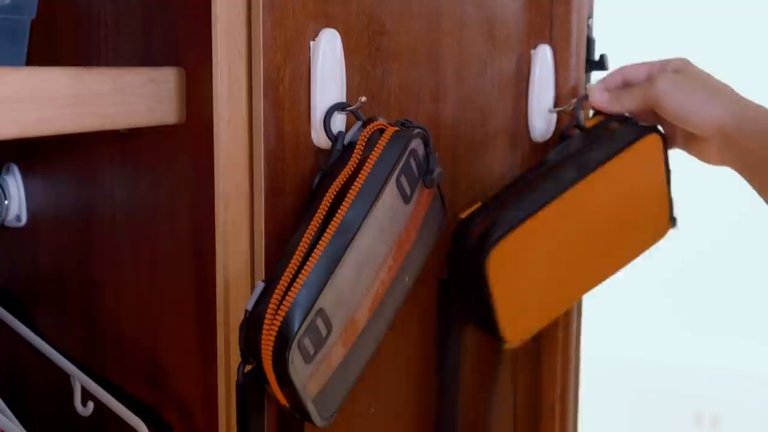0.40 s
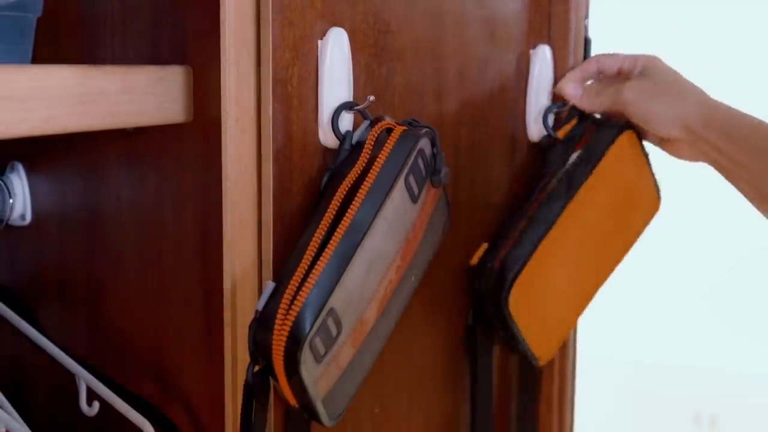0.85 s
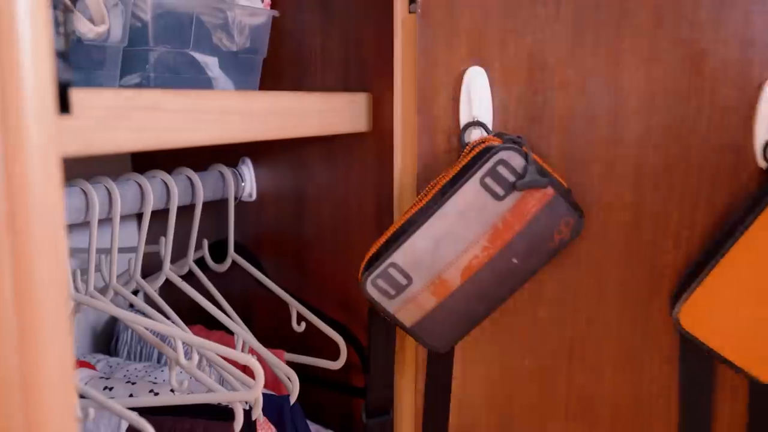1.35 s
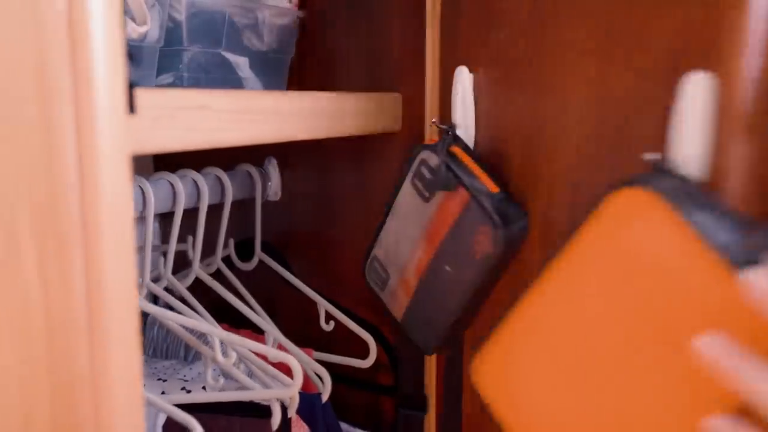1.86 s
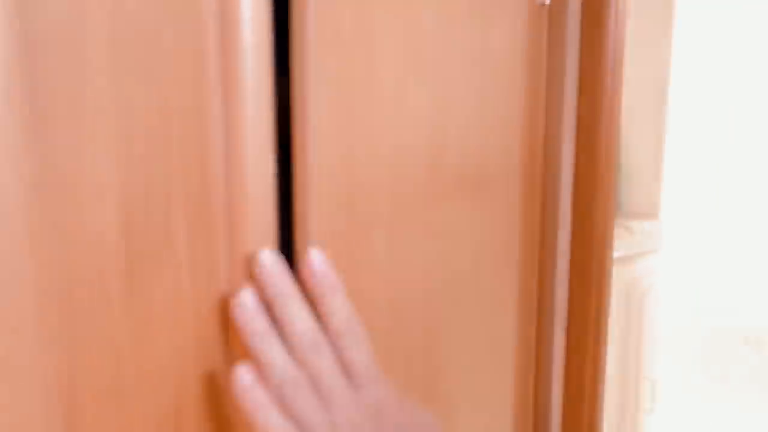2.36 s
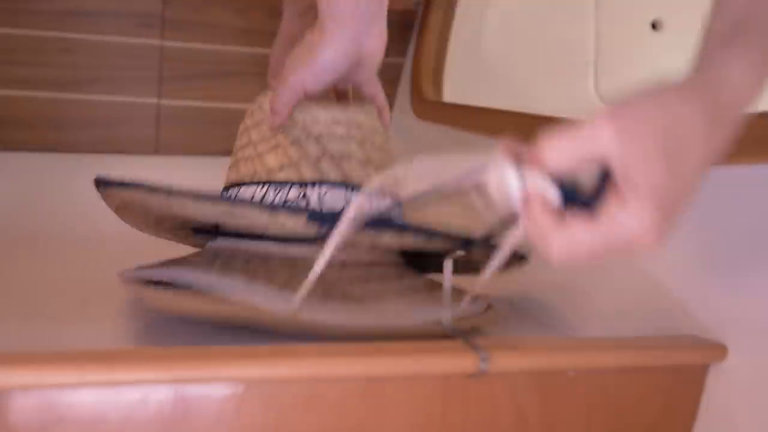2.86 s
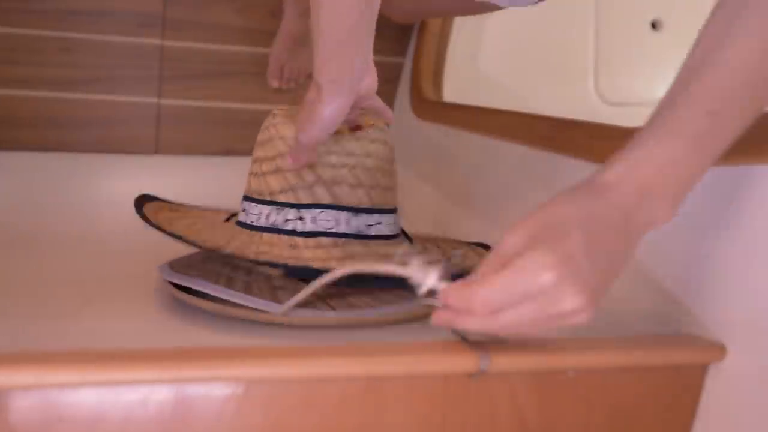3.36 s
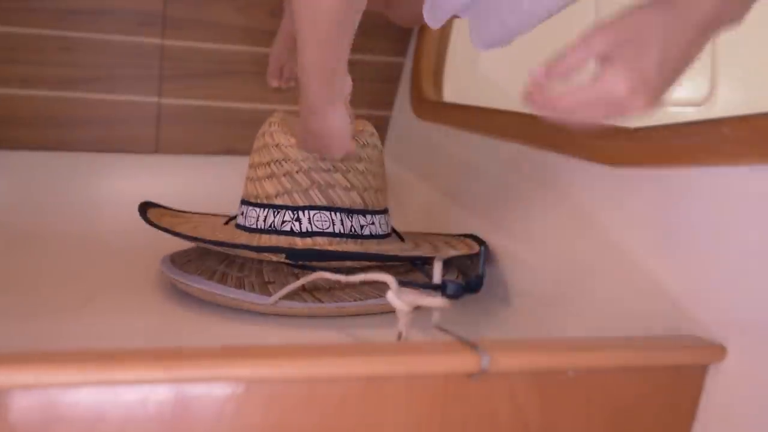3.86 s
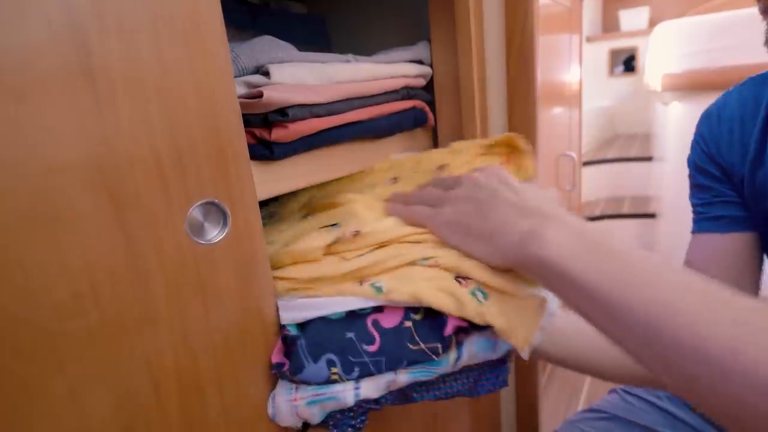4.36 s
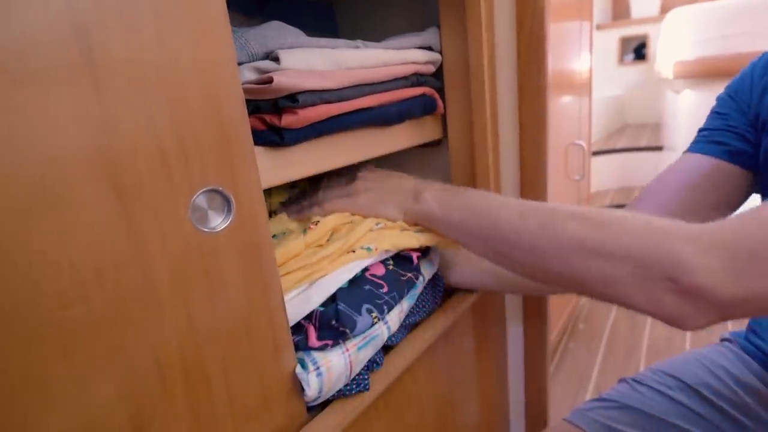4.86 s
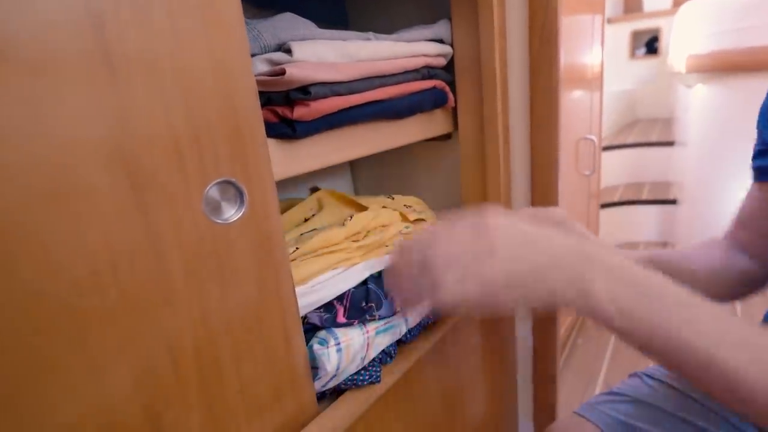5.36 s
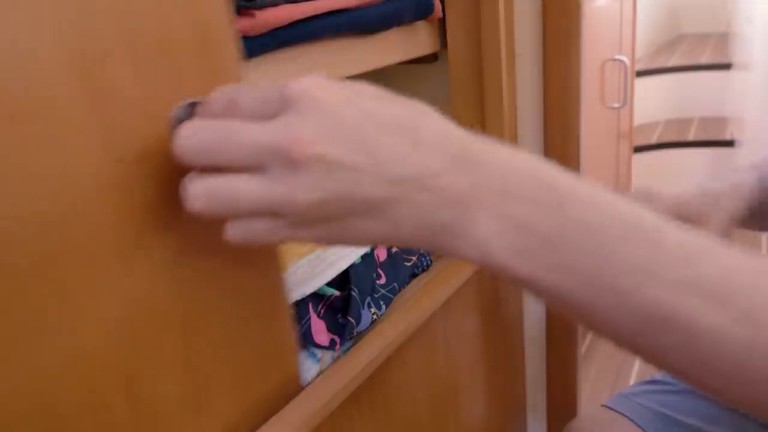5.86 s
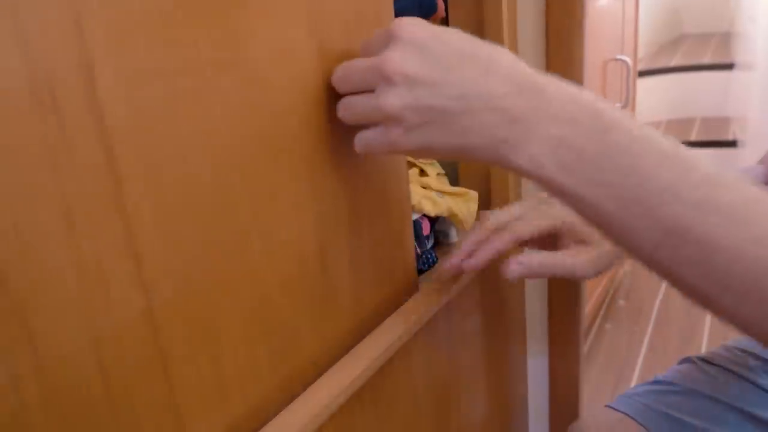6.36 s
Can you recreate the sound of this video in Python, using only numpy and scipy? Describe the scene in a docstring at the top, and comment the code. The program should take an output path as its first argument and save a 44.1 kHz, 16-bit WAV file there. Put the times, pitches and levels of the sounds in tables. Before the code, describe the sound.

Close-up stowing in a small wooden cabin: bottle knocks, hook clatter, door thumps, crisp straw ticks, soft cloth dragging, then a stuttering wooden sliding door.

```python
"""Stowing things in a wooden cabin

A bottle is set on a shelf, a pouch hung on a door hook, a wardrobe shut, straw hats laid down,
clothes pushed into a cupboard, and its door judders along a wooden track.
Blows are a push and a dying noise rattle through panel resonances; glass and squeaks are sines;
cloth, hands, sliding wood and air are shaped noise, with a faint whine. Noise tails of the walls answer the hits.
"""
import sys
import numpy as np
from scipy import signal
from scipy.fft import rfft, irfft, next_fast_len
from scipy.io import wavfile
from scipy.ndimage import uniform_filter1d, map_coordinates

SR = 44100
rng = np.random.default_rng(int(sys.argv[2]) if len(sys.argv) > 2 else 0)


def int16_out(signal):
    """Quantize to a 16-bit WAV file."""
    q = np.round(np.clip(np.atleast_2d(signal).T, -1, 1) * 32767)
    wavfile.write(sys.argv[1], SR, q.astype(np.int16))


def invert_db(x):
    """Field ratio 10**(x/20) for x, a level in decibels (scalar or array-like)."""
    u = np.asarray(x, float) / 20
    return 10 ** u


N = 297319  # samples


def unit(x):
    """Scaled to rms 1."""
    return x / np.sqrt(np.mean(x ** 2) + 1e-20)


def along(points, hz):
    """(hz, value) points interpolated on a log frequency axis."""
    f, v = np.transpose(points)
    return np.interp(np.log(hz + 1), np.log(f + 1), v)


def curves(rows):
    """One value per sample for each column after the time."""
    s, *cols = np.transpose(rows)
    return [np.interp(np.arange(N) / SR, s, c) for c in cols]


def wobble(rate_hz):
    """Smooth random curve, rate_hz knots a second."""
    knots = rng.standard_normal(int(N * rate_hz / SR) + 4)
    return map_coordinates(knots, [np.arange(N) * rate_hz / SR])


def filtered(x, response):
    """x times a complex response of frequency."""
    n = x.shape[-1]
    m = next_fast_len(n + SR // 8)
    return irfft(rfft(x, m) * response(np.fft.rfftfreq(m, 1 / SR)), m)[..., :n]


def add(out, start_s, sound):
    """Mixes a sound in at start_s."""
    spot = out[max(round(start_s * SR), 0):][:len(sound)]
    spot += sound[:len(spot)]


def strokes(rows):
    """Gain of movements that swell to a peak and fade, rise and fall per 20 dB; powers add."""
    t = np.arange(N) / SR
    power = 0
    for peak_s, db, rise_s, fall_s in rows:
        drop = np.maximum((peak_s - t) / abs(rise_s), (t - peak_s) / abs(fall_s))
        power = power + invert_db(db - 20 * drop) ** 2
    return np.sqrt(power)


def friction(spectrum, patchy_db, grain_db, rate_hz):
    """Shaped noise of rms 1, uneven in time and frequency, with random grains of level."""
    noise = rng.standard_normal(N) * invert_db(grain_db * wobble(rate_hz))
    z = signal.stft(noise, nperseg=512)[2]
    field = uniform_filter1d(rng.standard_normal(z.shape), size=5, axis=0)
    field = uniform_filter1d(field, size=5, axis=1)
    x = signal.istft(z * invert_db(patchy_db * unit(field)), nperseg=512)[1][:N]
    return unit(filtered(x, lambda hz: invert_db(along(spectrum, hz))))


def resonances(body, scatter_db, plain):
    """Causal panel response: a share of the plain blow plus second-order resonances."""
    def response(f):
        total = plain
        for (centre, width, gain_db), shift_db in zip(body, scatter_db):
            mode = 1j * f * width / (centre * centre - f * f + 1j * f * width)
            total = total + invert_db(gain_db + shift_db) * mode
        return total
    return response


def drag(body, spectrum):
    """Something drags over wood: stick and slip keep low resonances humming; panel applied twice, rms 1."""
    slips = rng.standard_normal(N) * invert_db(1.5 * wobble(90))
    ring = resonances(body, np.zeros(len(body)), plain=0.64)
    return unit(filtered(slips, lambda hz: ring(hz) ** 2 * invert_db(along(spectrum, hz))))


# room air spectrum: freq_hz, rel_db_per_hz
AIR_SPECTRUM = [(15, -43.5), (25, 14), (82, 11.5), (344, -40.5), (451, -2), (1290, -8.5), (1700, -7),
                (1840, -9), (2160, -11.5), (2350, -39), (16000, -21)]
# whine level: time_s, level_db
WHINE_LEVEL = [(0.0, -55), (.4, -63.5), (2.25, -60), (2.3, -80), (4.05, -75.5), (4.2, -56.5), (5.56, -54.5),
               (5.62, -75), (6.74, -73)]


def floor():
    """Still air as shaped noise; faint whine as a sine with drifting phase and level."""
    air_db, whine_hz = -53.5, 1672
    phase = 2 * np.pi * whine_hz * np.arange(N) / SR + np.cumsum(rng.normal(0, 0.0173, N))
    whine_gain = invert_db(curves(WHINE_LEVEL)[0] + 1.95 * wobble(8))
    whine = whine_gain * np.sqrt(2) * np.sin(phase)
    return whine + invert_db(air_db) * friction(AIR_SPECTRUM, patchy_db=3.04, grain_db=1.0, rate_hz=4.3)


# wall reverberation: freq_hz, t60_s
CABIN_DECAY = [(100, 0.227), (1000, 0.1836), (5000, 0.113), (14000, 0.275)]


def cabin(x):
    """Close wooden walls answer: decaying noise tails, a fresh one every 0.3 s."""
    out, step = np.zeros(N), SR * 3 // 10
    for start in range(0, N, step):
        hz, t, z = signal.stft(rng.standard_normal(SR // 2), SR, nperseg=256)
        fade = invert_db(-60 * t / along(CABIN_DECAY, hz)[:, None])
        tail = signal.istft(z * fade, SR, nperseg=256)[1]
        answer = signal.fftconvolve(x[start:start + step], tail / np.linalg.norm(tail))
        add(out, start / SR + .003, answer)
    return out


# rubbing levels: time_s, rumble_db, scrape_db
RUB_LEVELS = [(0.0, -38.5, -42), (0.5, -44, -48.5), (0.75, -42, -36), (0.88, -43.5, -50), (1.03, -31, -30),
              (1.24, -62.5, -57.5), (1.45, -47, -52.5), (1.8, -69, -62.5), (2.0, -57, -52.5),
              (2.33, -45, -56.5), (2.46, -27, -32), (2.53, -23, -41.5), (2.6, -29, -50), (2.7, -31.5, -39),
              (2.8, -48, -52.5), (3.3, -54, -52.5), (3.5, -56, -47), (4.0, -47, -52), (4.24, -51.5, -43.5),
              (4.47, -38, -37.5), (4.67, -29, -47), (5.1, -44, -43.5), (5.24, -30.5, -34.5),
              (5.4, -47, -52.5), (5.63, -47.5, -47), (5.76, -22.5, -36), (5.97, -29.5, -25.5),
              (6.18, -38, -32), (6.3, -28.5, -25.5), (6.42, -34, -37.5), (6.49, -39, -69.5),
              (6.58, -43.5, -67), (6.61, -39, -37), (6.74, -47.5, -36)]
# hands and cloth sweep by: peak_s, hiss_db, rise_s_per_20db, fall_s_per_20db (sign ignored)
HAND_SWEEPS = [(0.05, -55.5, 0.31, 0.94), (1.08, -52.5, 0.37, 0.31), (2.03, -50, 0.256, 0.14),
               (2.4, -45, 0.186, 0.19), (2.87, -47.5, 0.253, 0.2942), (3.45, -45, .12, 0.23),
               (3.525, -38.5, 0.125, 0.0968), (3.62, -42, 0.086, 0.038), (3.75, -59, 0.33, 0.43),
               (3.85, -43.5, 0.039, 0.1047), (3.89, -41, 0.091, -0.02), (4.13, -57, 0.19, 0.08),
               (4.52, -47, 0.566, -0.01), (4.77, -47.5, 0.105, 0.22), (5.26, -43, 0.53, 0.1573),
               (5.62, -46.5, 0.109, -1.7), (5.78, -29.5, 0.065, -0.0166), (5.98, -27.5, 0.162, 0.1139),
               (6.15, -45, 0.54, -1.06), (6.31, -28, 0.154, 0.0932), (6.42, -36, 0.37, -0.18),
               (6.6, -37.5, 0.014, 5.63), (6.67, -31.5, 0.076, 7.16), (6.74, -27, 0.12, 0.48)]
# cloth or straw jolted by a blow: peak_s, hiss_db
CLOTH_JOLTS = [(0.11, -44), (0.47, -31.5), (0.54, -38), (0.669, -51.5), (0.73, -42), (0.955, -38.5),
               (1.522, -39), (2.369, -36), (2.4, -40), (2.548, -42), (2.66, -36), (2.97, -40), (3.08, -45),
               (4.56, -34)]
# straw textured hiss: from_s, to_s
STRAW_TIME = (2.6, 3.97)
# spectra of panel rumble, scrape, cloth hiss, straw hiss: freq_hz, rel_db_per_hz
RUMBLE_SPECTRUM = [(18, -43), (30, -4), (102, 14), (132, -4.5), (170, -2.5), (220, -21.5), (370, -120)]
SCRAPE_SPECTRUM = [(88, -45.5), (150, 2.5), (352, -5.5), (395, -1), (468, 1), (563, -4), (771, -2.5),
                   (1250, -6.5), (1710, -8.5), (4500, -25), (5850, -73.5), (9900, -120)]
HISS_SPECTRUM = [(1500, -5), (2500, -0.5), (4000, -5), (7000, -7), (11000, -13), (14000, -13.5),
                 (15700, -17), (16400, -45)]
STRAW_SPECTRUM = [(1500, -3), (3000, -5), (6000, -5), (10000, -5), (14000, -4.5), (15700, -5.5),
                  (16400, -27)]


def rubbing():
    """Hands, cloth, straw, sliding wood: panels rumble, surfaces scrape, fibres hiss; straw is brightest."""
    still_db, jolt_rise_s, jolt_fall_s = -72.5, 0.0272, 0.116  # jolt times per 20 dB
    rumble_db, scrape_db = curves(RUB_LEVELS)
    jolts = [(s, db, jolt_rise_s, jolt_fall_s) for s, db in CLOTH_JOLTS]
    moves = strokes(HAND_SWEEPS + jolts)
    t = np.arange(N) / SR
    is_straw = (t > STRAW_TIME[0]) & (t < STRAW_TIME[1])
    straw = friction(STRAW_SPECTRUM, patchy_db=3.0, grain_db=1.0, rate_hz=730)
    cloth = friction(HISS_SPECTRUM, patchy_db=0.83, grain_db=1.5, rate_hz=240)
    hiss = np.where(is_straw, straw, cloth)
    rumble = friction(RUMBLE_SPECTRUM, patchy_db=2.0, grain_db=1.0, rate_hz=35)
    scrape = friction(SCRAPE_SPECTRUM, patchy_db=0.5, grain_db=2.0, rate_hz=180)
    return invert_db(rumble_db) * rumble + invert_db(scrape_db) * scrape + (invert_db(still_db) + moves) * hiss


# wood squeaks: start_s, length_s, pitch_hz, level_db
WOOD_SQUEAKS = [(5.234, 0.093, 4217, -50.5), (6.031, 0.225, 4078, -41)]


def squeaks():
    """Rubbing wood squeaks: thin sines with wandering phase and level."""
    out = np.zeros(N)
    for start_s, length_s, pitch_hz, level_db in WOOD_SQUEAKS:
        t = np.arange(int(length_s * SR)) / SR
        drift = np.cumsum(rng.normal(0, .045, len(t)))
        gain = invert_db(level_db + 2.8 * wobble(58.7)[:len(t)])
        swell = np.sqrt(np.sin(np.pi * t / length_s))
        add(out, start_s, gain * swell * np.sin(2 * np.pi * pitch_hz * t + drift))
    return out


# clothes pushed in: peak_s, level_db, rise_s_per_20db, fall_s_per_20db
CLOTHES_PUSHES = [(4.39, -31, 0.156, 0.2078), (5.27, -31, 0.154, 0.1171)]
# shelf under the clothes: centre_hz, width_hz, gain_db
CLOTHES_PANEL = [(282, 114, 1.45), (408.8, 45, 9.3), (464.6, 25.3, 7.5), (1003, 135, 3.4)]
# clothes drag spectrum: freq_hz, rel_db_per_hz
CLOTHES_SPECTRUM = [(100, -15), (250, 2.5), (500, -6), (1200, -6), (2500, -8.5), (6000, -59)]


def clothes():
    """The pile of clothes drags over its shelf in swelling strokes."""
    return strokes(CLOTHES_PUSHES) * drag(CLOTHES_PANEL, CLOTHES_SPECTRUM)


# parts of a blow (knock, thud, clack, crisp): low_hz, high_hz, t60_factor, push_weight
BLOW_PARTS = [(383.3, 1371, 1.075, 15.07), (56, 296, 1.54, 21.64), (1625, 4576, 1.118, 11.86),
              (5330, 24800, 0.402, 5.1)]


def blows(events, body, loose, rise_s, top_hz, plain):
    """One push and a dying rattle (weight loose) ring the panel, in four bands; rise_s caps the swell."""
    start_s, knock_db, thud_db, clack_db, crisp_db, t60_s = np.transpose(events)
    t = np.arange(SR * 3 // 10) / SR
    # every blow lands elsewhere and stirs the resonances differently
    scatter_db = 5.11 * rng.standard_normal((len(body), len(start_s), 1))
    ring = resonances(body, scatter_db, plain)
    rattle = loose * rng.standard_normal((len(start_s), len(t)))
    out = np.zeros(N)
    rel_dbs = [0 * knock_db, thud_db, clack_db, crisp_db]
    for (low_hz, high_hz, t60_factor, push), rel_db in zip(BLOW_PARTS, rel_dbs):
        fade = invert_db(-60 * t / (t60_factor * t60_s)[:, None]) + 1.66 * invert_db(-60 * t / 0.01096)
        band = signal.butter(3, [low_hz, min(high_hz, top_hz)], "bandpass", fs=SR, output="sos")
        # the treble speaks at once, the body takes a moment
        swell = 1 - np.exp(-(t + 1 / SR) / (rise_s * min(1, 500 / low_hz)))
        struck = filtered(rattle * fade + push * (t == 0), ring)
        part = swell * signal.sosfilt(band, struck)
        # size each part by its loudest 200 samples
        size = np.sqrt(2 * uniform_filter1d(part ** 2, size=200).max(1))
        for at_s, gain, row in zip(start_s, invert_db(knock_db + rel_db) / size, part):
            add(out, at_s, gain * row)
    return out


def like(events, **shared):
    """Full rows of a blow: shared values join the columns of the table."""
    own = iter(np.transpose(events))
    names = ("start_s", "knock_db", "thud_db", "clack_db", "crisp_db", "t60_s")
    return np.transpose([np.full(len(events), float(shared[name])) if name in shared else next(own)
                         for name in names])


# In all blow tables thud, clack and crisp are relative to the knock; t60_s is before t60_factor.
# straw snaps and cord toggles tick: start_s, knock_db, clack_rel_db, crisp_rel_db
HAT_TICKS = [(2.633, -36.5, 3.5, 6.5), (2.661, -34.5, 13.5, 12.5), (2.734, -40, 6, 7.5),
             (2.77, -32, -24.5, -24.5), (2.849, -48.5, 3, 12.5), (2.867, -52, -1, 18),
             (2.961, -39.5, -4, 8), (3.011, -36, -11, 3), (3.069, -39, -9, 3), (3.105, -46, 3.5, -2.5),
             (3.887, -34, -29.5, 1.5), (4.121, -38, -20, -4)]
# soft straw landing: start_s, knock_db, thud_rel_db, clack_rel_db
STRAW_PATS = [(2.926, -32.5, 4, -16), (2.945, -29.5, -5.5, -14.5), (3.503, -37, -3, -2),
              (3.593, -33.5, -1.5, -12.5), (3.836, -32, 2, -12), (3.86, -41, 1, 0)]
# shelf under the hats: centre_hz, width_hz, gain_db
HAT_PANEL = [(133.9, 18.3, 2.6), (198.3, 18, 5.34), (491.5, 46, 4.9), (609.6, 53, 3.1), (2712, 153, 3.8),
             (13250, 4500, 5.4)]


def hats():
    """Hats on a shelf: quick ticks, and pats with a slow rise."""
    ticks = like(HAT_TICKS, thud_db=-3, t60_s=0.095)
    pats = like(STRAW_PATS, crisp_db=-9.5, t60_s=0.154)
    return (blows(ticks, HAT_PANEL, loose=1.0, rise_s=0.0001, top_hz=15450, plain=0.875)
            + blows(pats, HAT_PANEL, loose=2.0, rise_s=0.0094, top_hz=16000, plain=1.0))


# glass modes: pitch_hz, rel_db, t60_s
GLASS_MODES = [(1588, 0, .17), (2480, -22, .12), (3865, -12, .11), (5350, -15, .07), (5530, -19, .15),
               (6330, -12, .09), (7250, -17, .14), (7900, -22, .08), (8800, -18, .1), (9400, -21, .1)]
# glass contacts: start_s, level_db, upper_rel_db
GLASS_CLINKS = [(0.0, -29.5, -30.5), (.048, -40, 9), (0.098, -32, 7.5), (0.141, -31, -12)]


def glass():
    """The bottle rings: decaying sines, a low wall mode and upper modes whose level each contact sets."""
    out, t = np.zeros(N), np.arange(SR // 2) / SR
    for start_s, level_db, upper_rel_db in GLASS_CLINKS:
        for pitch_hz, rel_db, t60_s in GLASS_MODES:
            mode_db = level_db + rel_db + upper_rel_db * (pitch_hz > 2000) + rng.normal(0, 1.25)
            add(out, start_s, invert_db(mode_db - 60 * t / t60_s) * np.sin(2 * np.pi * pitch_hz * t))
    return out


# bottle set down: start_s, knock_db, thud_rel_db, clack_rel_db, t60_s
BOTTLE_KNOCKS = [(0.047, -13, 0.5, -15, 0.0645), (0.1, -16.5, -21, -17, 0.0207),
                 (0.142, -19.5, 4, -27.5, 0.146)]
# shelf under the bottle: centre_hz, width_hz, gain_db
BOTTLE_PANEL = [(183.3, 33.3, 38), (321.6, 85, 21), (512.5, 173, 18.5), (611.2, 25.2, 24), (890, 72, 8.5)]


def bottle():
    """The bottle's contacts knock the shelf and ring the glass."""
    events = like(BOTTLE_KNOCKS, crisp_db=-34)
    return glass() + blows(events, BOTTLE_PANEL, loose=0.59, rise_s=0.006, top_hz=10500, plain=0.61)


# pouch against hook and door: start_s, knock_db, clack_rel_db, crisp_rel_db, t60_s
POUCH_KNOCKS = [(0.456, -19, 9.5, -2.5, 0.31), (0.529, -23, -4, -2, 0.168), (0.627, -16, 3.5, -17, 0.1706),
                (0.736, -33.5, 4, -2, 0.082), (0.88, -12, -12, -38.5, 0.217), (0.926, -26.5, 2, 1.5, 0.1),
                (0.952, -21, 6.5, -28, 0.121), (1.014, -25.5, -4, -27, 0.054),
                (1.076, -23.5, 1, -23, 0.118), (1.199, -30.5, 5, -36, 0.173), (1.519, -29, 5.5, 4, 0.111),
                (1.833, -41.5, -8, -14.5, 0.313), (1.867, -38.5, -13, -12.5, 0.255)]
# pouch body bumps the door: start_s, knock_db
POUCH_BUMPS = [(0.629, -39.5), (0.881, -33), (0.926, -40.5), (1.014, -47)]
# pouch ring ticks on the hook: start_s, knock_db
RING_TICKS = [(0.584, -27), (0.719, -24.5), (0.768, -26), (0.825, -36), (1.142, -28.5), (1.247, -40),
              (1.312, -34), (1.344, -39), (1.406, -28.5)]
# door with the hook, ring on the hook: centre_hz, width_hz, gain_db
HOOK_PANEL = [(181, 18.1, 23.2), (651.5, 205, 4.4), (799.6, 108, 1.5), (930, 57, 9.06), (2095, 264, 12),
              (2416, 150, 5.9), (2747, 430, 16), (3410, 426, 6.5)]
RING_MODES = [(824, 120, 29.5), (1980, 310, 3)]


def pouch():
    """Hook knocks and dull body bumps ring the door; the pouch's ring ticks on its own modes."""
    hook = like(POUCH_KNOCKS, thud_db=-20.5)
    bumps = like(POUCH_BUMPS, thud_db=15.5, clack_db=-17, crisp_db=-30, t60_s=0.176)
    ticks = like(RING_TICKS, thud_db=-40.5, clack_db=-18.5, crisp_db=-37.5, t60_s=0.069)
    return (blows(hook, HOOK_PANEL, loose=1.13, rise_s=0.00126, top_hz=10860, plain=0.564)
            + blows(bumps, HOOK_PANEL, loose=0.956, rise_s=0.0045, top_hz=9000, plain=0.54)
            + blows(ticks, RING_MODES, loose=0.35, rise_s=0.0013, top_hz=9000, plain=0.305))


# wardrobe door shut: start_s, knock_db, thud_rel_db, clack_rel_db, crisp_rel_db
WARDROBE_KNOCKS = [(1.446, -53, 12, 4, -1), (2.272, -32, -29.5, -6, 5), (2.319, -48.5, 16.5, 13.5, 4),
                   (2.357, -14.5, 8, -8, -10.5), (2.398, -16, -14, -3, -3), (2.409, -19, -2, 0, -18.5),
                   (2.463, -33, 8, 5, -26), (2.513, -20.5, 11, -4, -15.5), (2.546, -19, 7.5, -6, -15),
                   (2.617, -41, 15, 3, 3.5)]
# wardrobe door: centre_hz, width_hz, gain_db
WARDROBE_PANEL = [(102.6, 28.6, 24.54), (234, 13.5, 6.3), (367.9, 33, 5.5), (555.7, 143, 9.4),
                  (1195, 67, 3.3), (1880, 490, 2.3)]


def wardrobe():
    """The shutting door knocks and rings its own panel."""
    events = like(WARDROBE_KNOCKS, t60_s=0.1026)
    return blows(events, WARDROBE_PANEL, loose=0.924, rise_s=0.00258, top_hz=14770, plain=1.0)


# hands bump the cupboard: start_s, knock_db, thud_rel_db, clack_rel_db, crisp_rel_db
STOWING_BUMPS = [(4.384, -29, -8.5, -6.5, -16), (4.462, -33.5, 4.5, -29, -11.5), (4.563, -12, -1, -4, -17),
                 (4.683, -39.5, 20, 3.5, -4.5), (4.756, -18, -6.5, -8.5, -37.5),
                 (4.854, -21.5, -8, -14, -28.5), (4.924, -25, -9.5, -9, -32),
                 (4.959, -38, 24.5, -25.5, -26), (4.981, -28.5, -1, -4.5, -30.5),
                 (4.996, -28.5, 2, -9, -29), (5.128, -40, 14, -4.5, -11.5), (5.454, -52.5, 3, 18, 28),
                 (5.582, -31.5, 13, -3, -11.5)]
# cupboard shelf: centre_hz, width_hz, gain_db
CUPBOARD_PANEL = [(121.8, 21.8, 5.7), (254.3, 60, 5.98), (651.5, 79.6, 7.63), (785.2, 62.5, 11.3),
                  (1584, 175, 0.97), (1865, 104, 2.3), (2574, 377, 9.7)]


def stowing():
    """Hands bump the cupboard and ring its shelf."""
    events = like(STOWING_BUMPS, t60_s=0.0697)
    return blows(events, CUPBOARD_PANEL, loose=1.0, rise_s=0.00454, top_hz=15800, plain=0.79)


# cupboard door: centre_hz, width_hz, gain_db
SLIDING_PANEL = [(113.3, 11.6, 8.35), (169.8, 38.3, 6.8), (232.3, 98.6, 6.94), (612.3, 134, 10.3),
                 (765.3, 91, 3.5), (1021, 17.8, 3.3), (1654, 156, 0.39), (2232, 830, 1.03)]
# level following the door's speed: time_s, level_db
SLIDE_LEVEL = [(5.74, -37), (5.772, -29), (5.886, -39.5), (5.908, -23), (6.026, -47.5), (6.046, -18.5),
               (6.156, -11.5), (6.294, -27), (6.324, -23), (6.399, -54.5), (6.421, -18), (6.46, -40.5)]
# door drag spectrum: freq_hz, rel_db_per_hz
DOOR_SPECTRUM = [(40, -40), (100, -1), (200, 1), (300, 3), (600, -14.5), (1000, -56), (2000, -38),
                 (5000, -60)]


def slide():
    """The door drags on its track, near silent outside the level table."""
    s, db = np.transpose(SLIDE_LEVEL)
    gain = invert_db(np.interp(np.arange(N) / SR, s, db, -120, -120))
    return gain * drag(SLIDING_PANEL, DOOR_SPECTRUM)


# cupboard door knocks: start_s, knock_db, thud_rel_db, clack_rel_db, crisp_rel_db
DOOR_KNOCKS = [(5.725, -26, -5, 5.5, -4), (5.755, -9.5, -5.5, -8, -17.5), (5.769, -9.5, -4, -3, -12),
               (5.799, -13, -2.5, -6, -30.5), (5.819, -20, -8, -31.5, -34), (5.866, -15.5, -12, 1, -2.5),
               (5.979, -19, -9, 1.5, -27), (6.245, -19, 6, -4.5, -19.5), (6.289, -12, -9.5, -6.5, -17.5),
               (6.31, -10.5, -2, -1.5, -15), (6.416, -31, 15.5, -3, -7.5), (6.475, -34.5, 4.5, -16.5, -26),
               (6.727, -20.5, 12, -9, -25.5)]
# door sticks and slips on its track: start_s, knock_db, thud_rel_db, clack_rel_db
DOOR_JUDDER = [(6.04, -4.5, -16.5, -11), (6.06, -15, 5.5, -6.5), (6.093, -6.5, -0.5, -14.5),
               (6.112, -16.5, 2, -25), (6.131, -4, -0.5, -14.5), (6.166, -9, -13, -27.5),
               (6.186, -12, 5, -37), (6.201, -12.5, 5, -36), (6.223, -21.5, 14, -28.5)]


def cupboard_door():
    """Knocks and stick-slip judder ring the sliding door's panel."""
    events = like(DOOR_KNOCKS, t60_s=.135)
    judder = like(DOOR_JUDDER, crisp_db=-37.5, t60_s=0.0556)
    return (blows(events, SLIDING_PANEL, loose=1.0, rise_s=0.00234, top_hz=11130, plain=0.866)
            + blows(judder, SLIDING_PANEL, loose=0.279, rise_s=0.0032, top_hz=11000, plain=0.76))


def scene():
    """Hits ring in the cabin over sliding, rubbing and floor."""
    hits = hats() + bottle() + pouch() + wardrobe() + stowing() + cupboard_door()
    steady = floor() + rubbing() + squeaks() + clothes() + slide()
    return (hits + invert_db(-7.5) * cabin(hits) + steady)[None]


def top_cut(x):
    """Nothing passes above the cut-off."""
    return signal.sosfilt(signal.butter(12, 16510, fs=SR, output="sos"), x)


def record(dry):
    """Band limit and soft clipping."""
    top_hz, ceiling = 16400, 0.8
    x = filtered(dry, lambda hz: hz < top_hz)
    mix = x / (1 + np.abs(x / ceiling) ** 5) ** (1 / 5)
    return top_cut(mix)


dry = scene()
out = record(dry)
int16_out(out)
```